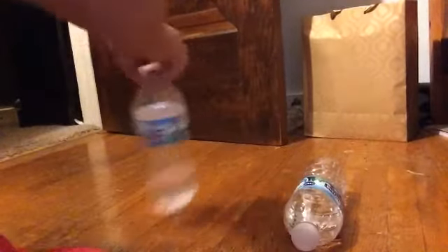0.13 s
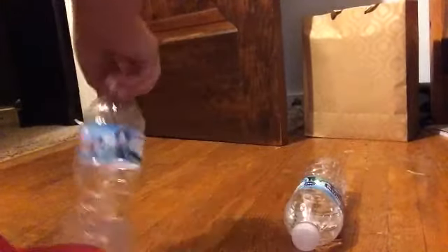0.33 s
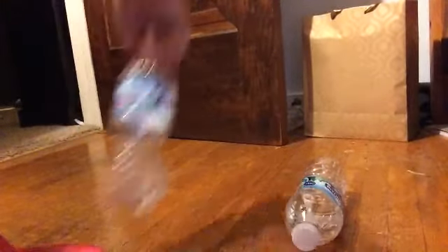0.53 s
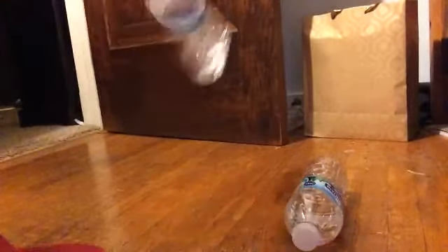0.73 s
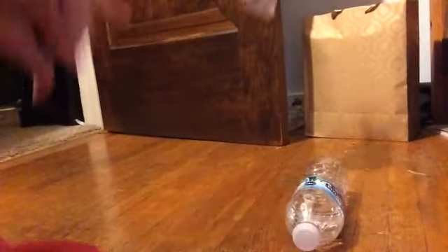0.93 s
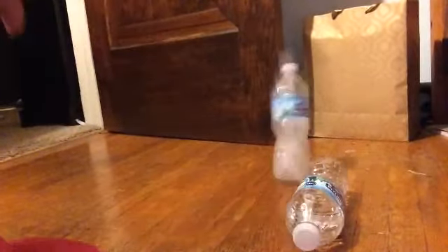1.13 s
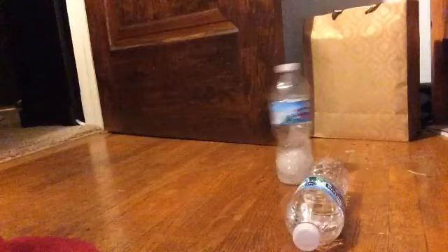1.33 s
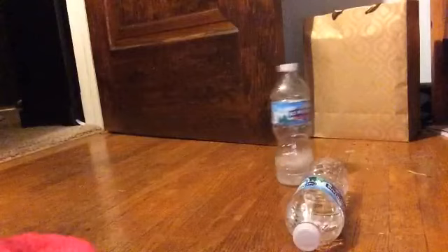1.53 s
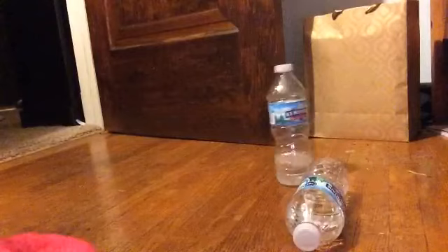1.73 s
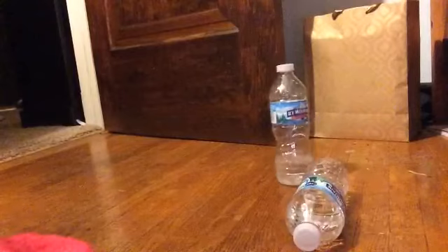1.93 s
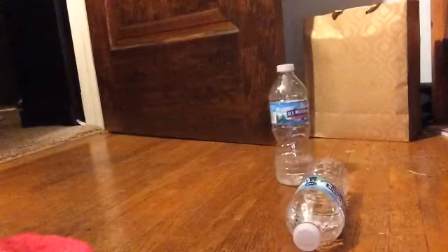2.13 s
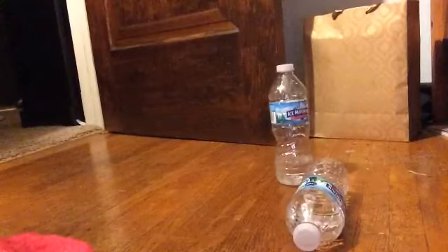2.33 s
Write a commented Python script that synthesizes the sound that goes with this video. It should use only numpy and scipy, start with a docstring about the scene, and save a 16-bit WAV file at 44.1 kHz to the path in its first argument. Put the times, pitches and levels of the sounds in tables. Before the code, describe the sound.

A part-filled plastic water bottle is flipped with a faint gulp and crinkle, then hits a hardwood floor with one loud, hollow knock; water slaps and settles quietly. Small room, close microphone, low rumble.

```python
"""Landing of a flipped water bottle

A part-filled plastic bottle is swung, flipped and lands upright on a hardwood floor in a small room.
Brief forces excite damped modes of the base, shell and floorboards, while the buckling wall cracks as noise.
The water is heard as random drops, a low noise wash, gliding resonances and decaying bubble tones; the thin
shell crinkles in bursts of peaked noise. Diffuse reflections and a low room rumble surround it all.
"""
import sys
import numpy as np
from scipy import signal
from scipy.fft import rfft, irfft
from scipy.io import wavfile

SR = 44100
rng = np.random.default_rng(int(sys.argv[2]) if len(sys.argv) > 2 else 0)


def wav_record(signal):
    """Record a signal, one row per channel, as 16-bit PCM in the file named by sys.argv[1]."""
    frames = np.transpose(np.atleast_2d(signal))
    bounded = np.clip(frames, -1, 1)
    # unit amplitude maps onto the largest positive 16-bit level
    quanta = np.round(bounded * 32767).astype(np.int16)
    wavfile.write(sys.argv[1], SR, quanta)


N = 104384
TIME = np.arange(N) / SR   # s

# Spectral tables give relative power density: only their shape counts, as each sound is scaled to rms 1.

# Contacts of the base with the floor, rim first: [t/s, relative level/dB]
BASE_CONTACTS = [(1.1480, -12), (1.1503, 2), (1.1516, 0), (1.1542, -3), (1.1555, -7.5), (1.1583, -11)]
# Short modes of the base: [f/Hz, relative level/dB, t60/s]
BASE_MODES = [(782, -17.5, .03), (1000, -23, .025), (1248, -24, .028), (2678, -29, .025), (3120, -27, .025)]
CONTACT_S = .00015   # length of a hard contact
BASE_DB = -1.5

# Spectrum of the buckling wall: [f/Hz, relative level/dB per Hz]
BUCKLE_SPECTRUM = [(300, -9), (550, -8), (850, 6.5), (1600, 1), (3100, 0.5), (4500, -5), (7300, -8.5),
                   (10000, -16), (15000, -23)]
BUCKLE_S, BUCKLE_DB = 1.1478, -16.5
BUCKLE_ATTACK_S, BUCKLE_HOLD_S, BUCKLE_T60_S = 0.0025, 0.0041, .028

# Modes of the floorboards: [f/Hz, relative level/dB, t60/s]
BOARD_MODES = [(82, -35, .22), (95, -29, .17), (138, -32, .18), (174, -19.5, .115), (208, -17, .05),
               (264, -28, .08), (320, -25, .07), (452, -38, .1)]
# Pushes of the bottle rocking on its base: [t/s, relative level/dB]
ROCKING_PUSHES = [(1.216, -20), (1.277, -33), (1.304, -41), (1.385, -45), (1.488, -41), (1.515, -39),
                  (1.588, -41.5), (1.722, -41), (1.810, -48.5), (1.859, -40.5), (1.952, -41)]
THUMP_S, THUMP_PUSH_S, THUMP_DB = 1.1500, 0.0017, 4.5
ROCK_PUSH_S = 0.0038   # rocking presses softly on the boards

# Longer modes of the shell and the air in it: [f/Hz, relative level/dB, t60/s]
SHELL_MODES = [(783, -33, .18), (997, -39, .12), (1055, -33, .11), (1248, -39, .11), (1430, -41, .13),
               (1498, -38, .11), (1864, -34, .11), (2162, -37, .13), (2314, -39, .13), (2678, -38, .11),
               (3055, -33, .11), (3156, -31, .12), (3440, -37, .11), (3636, -37, .11)]
SHELL_DB = 1

# Spectrum of the water crashing onto the base: [f/Hz, relative level/dB per Hz]
SLAP_SPECTRUM = [(60, -7.5), (130, -1.5), (230, 3), (420, -0.5), (600, -1), (950, -0.5), (1500, -5.5),
                 (3500, -8.5), (7000, -15), (15000, -28.5)]
SLAP_DB, SLAP_ATTACK_S, SLAP_T60_S, SLAP_DROPS_PER_S = -33.5, .004, 0.24, 3700

# Spray against the wall of the bottle: [t/s, level/dB]
SPRAY_LEVEL = [(0, -106), (.68, -89.5), (.76, -66.5), (.83, -100), (.95, -82.5), (.985, -60.5),
               (1.025, -75.5), (1.06, -68), (1.11, -78.5), (1.29, -70.5), (1.39, -76.5), (1.46, -82.5),
               (2.37, -92)]
# Spectrum of the spray: [f/Hz, relative level/dB per Hz]
SPRAY_SPECTRUM = [(500, -4.5), (1300, -1), (3200, 1.5), (6000, -2.5), (10000, -6), (15000, -10.5)]
SPRAY_DROPS_PER_S = 1700
DROP_SPREAD_DB = 5   # mean of the exponential spread in drop level, before its cap

# Low wash of the water: [t/s, level/dB]
WASH_LEVEL = [(0, -69), (.28, -68.5), (.42, -77), (.62, -79), (.82, -64.5), (.96, -87), (1.08, -65),
              (1.3, -64.5), (1.52, -69), (1.66, -73.5), (1.74, -71.5), (1.87, -70), (2.05, -74),
              (2.37, -78)]
# Spectrum of the wash: [f/Hz, relative level/dB per Hz]
WASH_SPECTRUM = [(50, -15), (100, -2.5), (170, -1), (350, -2.5), (520, -8.5), (800, -18.5), (2000, -25.5),
                 (6000, -44.5)]

# Hollow resonance of the rocking water: [t/s, f/Hz, level/dB]
SLOSH_GLIDE = [(0, 625, -76), (.24, 585, -71.5), (.31, 560, -84), (.39, 1050, -84.5), (.68, 680, -89.5),
               (1.4, 520, -82), (1.65, 640, -89), (1.8, 900, -85.5), (1.94, 1040, -93), (2.03, 680, -85),
               (2.12, 800, -91), (2.24, 1250, -86), (2.37, 1400, -91)]
SLOSH_WIDTH_HZ = 22   # half-width of each resonance
SLOSH_UPPER_RATIO, SLOSH_UPPER_DB = 1.73, -10.5   # relative to the lower resonance

# Gulps and drips of the water: [t/s, level/dB, initial f/Hz, t60/s]
BUBBLES = [(.770, -40.5, 338, 0.037), (0.773, -55, 152, 0.17), (0.809, -60, 320, 0.11),
           (1.302, -58, 3170, 0.037), (1.505, -59, 430.5, 0.098), (1.59, -61, 440, .06),
           (1.725, -59, 442, 0.061), (1.398, -68.5, 2600, 0.05), (1.535, -67.5, 2580, 0.027),
           (1.69, -75, 2615, 0.045), (1.831, -71, 2617, 0.05), (1.956, -69, 2660, 0.045),
           (1.935, -75, 1050, 0.11), (1.97, -70, 852, 0.11), (2.0675, -67.5, 2684, 0.041)]
BUBBLE_RISE_PER_S, BUBBLE_ATTACK_S = 0.17, 0.0015   # rise as a fraction of the initial pitch

# Crinkles of the shell: [t/s, level/dB, centre f/Hz]
CRINKLES = [(0.548, -63, 4260), (0.737, -65, 3480), (0.741, -67, 3130), (0.76, -56.5, 3900),
            (0.7651, -52, 4130), (0.7678, -48.5, 3060), (0.767, -58.5, 1400), (0.7703, -50.5, 2690),
            (.782, -78, 3500), (0.847, -68.5, 10800), (0.876, -66, 8200), (.902, -69, 3760),
            (0.929, -67.5, 1700), (0.9322, -60, 3550), (.976, -61.5, 6000), (.982, -58.5, 4500),
            (1.018, -67, 10500), (1.050, -57.5, 3230), (1.052, -62.5, 800), (1.072, -61.5, 1500),
            (1.059, -62.5, 3130), (1.074, -56.5, 6030), (1.304, -68, 3130), (1.364, -61, 3446),
            (1.534, -63, 6700), (1.596, -72, 2500)]
CRINKLE_T60_S, CRINKLE_Q, CRINKLE_SNAP_DB = 0.021, 2, -15

# Reverberation time of the room: [f/Hz, t60/s]
ROOM_T60 = [(80, .4), (200, 0.083), (800, 0.19), (3000, 0.2), (8000, 0.11), (15000, .16)]
# Level of the reflections: [f/Hz, level/dB]
ROOM_LEVEL = [(80, -11.5), (200, -12.5), (450, -11), (800, -20), (2000, -14.5), (5000, -12.5),
              (12000, -5.5)]
ROOM_ONSET_S = 0.014
BOARDS_ROOM_DB, SHELL_ROOM_DB = -3.5, -6.5   # share sent into the reflections

# Spectrum of the room rumble and hiss: [f/Hz, relative level/dB per Hz]
RUMBLE_SPECTRUM = [(15, -39.5), (25, -12.5), (98, 4.5), (181, -5.5), (243, -13), (286, -8), (404, -19),
                   (462, -15), (501, -29), (673, -19.5), (1500, -29), (4150, -30.5), (15000, -35)]
RUMBLE_DB = -67.5

MIC_LOW_CUT_HZ, CUTOFF_HZ = 40, 15300
OVERLOAD = .8   # ceiling (amplitude) towards which peaks are rounded


def base_knock():
    """Impulsive excitation: quick hard contacts set the damped modes of the base ringing."""
    clicks = sum(from_db(db) * push(s, CONTACT_S) for s, db in BASE_CONTACTS)
    return from_db(BASE_DB) * ring(clicks, BASE_MODES)


def wall_buckle():
    """Buckling: the wall gives way under the blow in a brief burst of broadband noise."""
    age = TIME - BUCKLE_S
    rise = np.clip(age / BUCKLE_ATTACK_S, 0, 1)
    envelope = rise * decay(age - BUCKLE_ATTACK_S - BUCKLE_HOLD_S, BUCKLE_T60_S)
    return from_db(BUCKLE_DB) * envelope * coloured(rng.standard_normal(N), BUCKLE_SPECTRUM)


def boards():
    """Forced modes: the water's weight thumps the floor, then rocks on it with longer, softer pushes."""
    thump = from_db(THUMP_DB) * push(THUMP_S, THUMP_PUSH_S)
    rocking = sum(from_db(db) * push(s, ROCK_PUSH_S) for s, db in ROCKING_PUSHES)
    return ring(thump + rocking, BOARD_MODES)


def shell():
    """Free vibration: one blow leaves the shell and the air inside it ringing."""
    return from_db(SHELL_DB) * ring(push(THUMP_S, CONTACT_S), SHELL_MODES)


def water_slap():
    """Dense random impacts: the water crashes onto the base and the patter decays exponentially."""
    age = TIME - THUMP_S
    envelope = np.clip(age / SLAP_ATTACK_S, 0, 1) * decay(age, SLAP_T60_S)
    return from_db(SLAP_DB) * envelope * drops(SLAP_DROPS_PER_S, SLAP_SPECTRUM)


def spray():
    """Random impacts: drops patter on the wall of the bottle at a varying level."""
    level_db, = in_time(SPRAY_LEVEL)
    return from_db(level_db) * drops(SPRAY_DROPS_PER_S, SPRAY_SPECTRUM)


def wash():
    """Turbulent flow: the low wash of the water is shaped noise of varying level."""
    level_db, = in_time(WASH_LEVEL)
    return from_db(level_db) * coloured(rng.standard_normal(N), WASH_SPECTRUM)


def slosh():
    """Narrow-band resonance: slow noise modulates two carriers that glide as the water rocks."""
    hz, level_db = in_time(SLOSH_GLIDE)
    phase = 2 * np.pi * np.cumsum(hz) / SR
    lowpass = signal.butter(2, SLOSH_WIDTH_HZ, fs=SR, output="sos")
    a, b, c, d = signal.sosfilt(lowpass, rng.standard_normal((4, N)))
    lower = rms_one(a * np.cos(phase) + b * np.sin(phase))
    upper_phase = SLOSH_UPPER_RATIO * phase
    upper = rms_one(c * np.cos(upper_phase) + d * np.sin(upper_phase))
    return from_db(level_db) * (lower + from_db(SLOSH_UPPER_DB) * upper)


def bubbles():
    """Bubble resonance: pockets of air ring as decaying sines that rise a little in pitch."""
    out = np.zeros(N)
    for s, db, hz, t60 in BUBBLES:
        age = np.maximum(TIME - s, 0)
        envelope = np.minimum(age / BUBBLE_ATTACK_S, 1) * decay(age, t60)
        # integral of a linearly rising frequency
        phase = 2 * np.pi * hz * age * (1 + BUBBLE_RISE_PER_S * age / 2)
        out += from_db(db) * envelope * np.sin(phase)
    return out


def crinkles():
    """Local resonance: a patch of shell gives a short burst of peaked noise, with a fainter broadband snap."""
    out = np.zeros(N)
    for s, db, hz in CRINKLES:
        noise = rng.standard_normal(N)
        b, a = signal.iirpeak(hz, CRINKLE_Q, fs=SR)
        once = signal.lfilter(b, a, noise)
        patch = rms_one(signal.lfilter(b, a, once))
        envelope = (TIME >= s) * decay(TIME - s, CRINKLE_T60_S)
        out += from_db(db) * envelope * (patch + from_db(CRINKLE_SNAP_DB) * noise)
    return out


def room(x):
    """Diffuse reverberation: reflections build up, then die exponentially band by band."""
    t, tail = TIME[:SR // 2], 0
    edges = np.geomspace(50, 17000, 15)   # Hz
    for low, high in zip(edges, edges[1:]):
        hz = np.sqrt(low * high)
        bandpass = signal.butter(2, [low, high], "band", fs=SR, output="sos")
        band = signal.sosfilt(bandpass, rng.standard_normal(len(t)))
        band = band * np.minimum(t / ROOM_ONSET_S, 1) ** 2 * decay(t, at_hz(ROOM_T60, hz))
        # energy in proportion to bandwidth
        unit_gain = np.sqrt(2 * (high - low) / SR / np.sum(band ** 2))
        tail = tail + band * from_db(at_hz(ROOM_LEVEL, hz)) * unit_gain
    return signal.fftconvolve(x, tail)[:N]


def room_rumble():
    """Stationary noise: a steady low rumble with faint hiss."""
    return from_db(RUMBLE_DB) * coloured(rng.standard_normal(N), RUMBLE_SPECTRUM)


def push(s, length):
    """Impulse of a force: a rounded sine-squared pulse of unit area."""
    force = np.sin(np.pi * np.clip((TIME - s) / length, 0, 1)) ** 2
    return force / force.sum()


def ring(drive, modes):
    """Modal superposition: convolve a force with a sum of exponentially damped cosines."""
    t = TIME[:SR // 2]
    body = sum(from_db(db) * np.cos(2 * np.pi * hz * t) * decay(t, t60) for hz, db, t60 in modes)
    return signal.fftconvolve(drive, body)[:N]


def drops(per_s, spectrum):
    """Random impulse train: drops of uneven size and either sign, shaped in spectrum to rms 1."""
    size_db = DROP_SPREAD_DB * np.minimum(rng.exponential(1, N), 4)
    sizes = from_db(size_db) * rng.choice([-1, 1], N)
    return coloured(sizes * (rng.random(N) < per_s / SR), spectrum)


def coloured(x, spectrum):
    """Spectral filtering: weight the Fourier components by a table, then scale to rms 1."""
    hz = np.arange(N // 2 + 1) * SR / N
    return rms_one(irfft(rfft(x) * from_db(at_hz(spectrum, hz)), N))


def decay(age, t60):
    """Exponential decay: full level until age 0, then a fall of 60 dB per t60."""
    return np.exp(-np.log(1000) * np.maximum(age, 0) / t60)


def in_time(rows):
    """Linear interpolation: the columns of a time table at every sample."""
    s, *columns = np.transpose(rows)
    return [np.interp(TIME, s, c) for c in columns]


def at_hz(points, hz):
    """Logarithmic interpolation: read a table on a log-frequency axis."""
    f, value = np.transpose(points)
    return np.interp(np.log(np.maximum(hz, 1)), np.log(f), value)


def rms_one(x):
    """Power normalisation: scale to an rms value of 1."""
    return x / np.sqrt(np.mean(x ** 2) + 1e-20)


def from_db(db):
    """Decibel law: 20 dB for each factor of ten in amplitude."""
    return 10 ** (np.asarray(db) / 20)


def scene():
    """Superposition: bottle, water and floor add to their reflections and the room rumble."""
    plastic = base_knock() + wall_buckle() + crinkles()
    water = bubbles() + slosh() + spray() + wash() + water_slap()
    bottle, ringing, thump = plastic + water, shell(), boards()
    wet = room(bottle + from_db(SHELL_ROOM_DB) * ringing + from_db(BOARDS_ROOM_DB) * thump)
    return (bottle + ringing + thump + wet + room_rumble())[None]


def record(dry):
    """Transducer response: a small microphone thins the bass and rounds peaks; the top is cut steeply."""
    low_cut = signal.butter(1, MIC_LOW_CUT_HZ, "high", fs=SR, output="sos")
    x = signal.sosfilt(low_cut, dry)
    x = OVERLOAD * np.tanh(x / OVERLOAD)
    top_cut = signal.ellip(12, .1, 80, CUTOFF_HZ, fs=SR, output="sos")   # ripple, stopband in dB
    return signal.sosfilt(top_cut, x)


dry = scene()
out = record(dry)
wav_record(out)
```